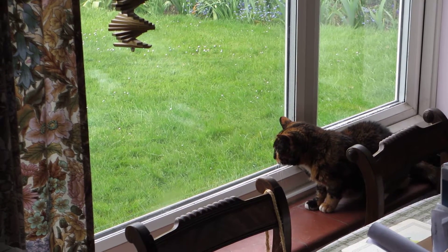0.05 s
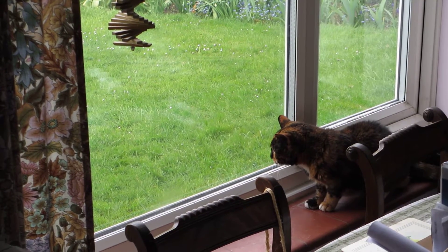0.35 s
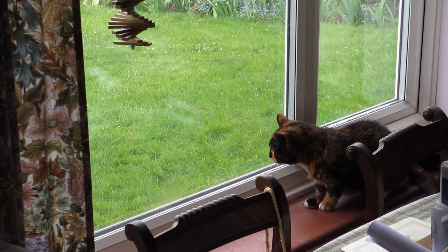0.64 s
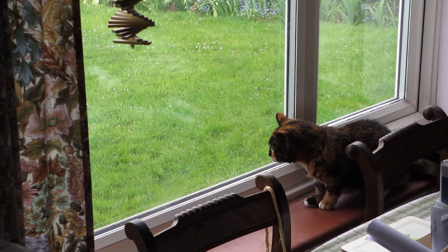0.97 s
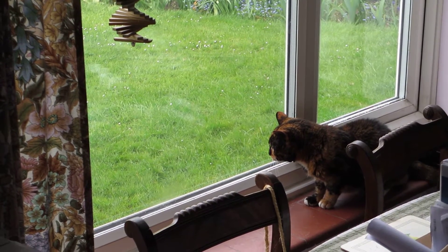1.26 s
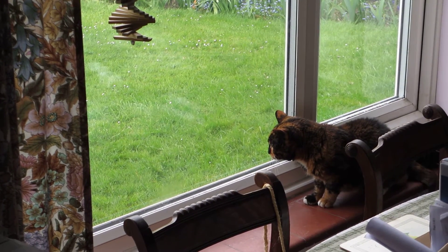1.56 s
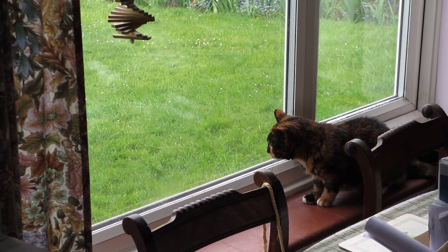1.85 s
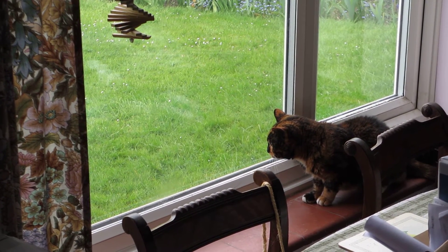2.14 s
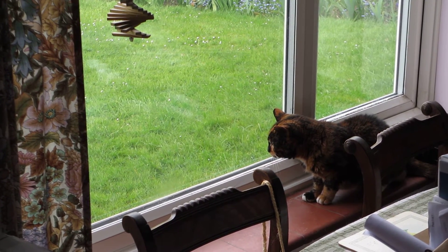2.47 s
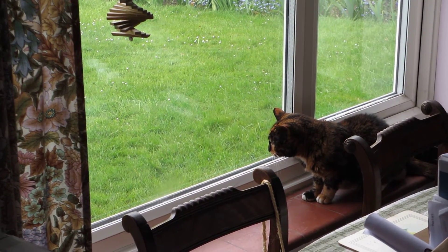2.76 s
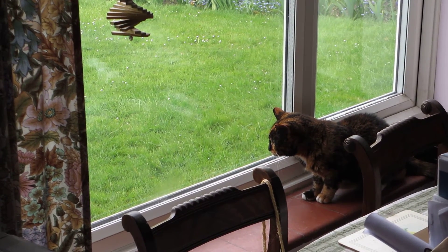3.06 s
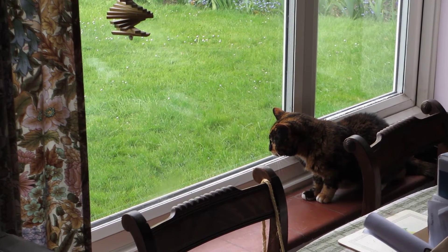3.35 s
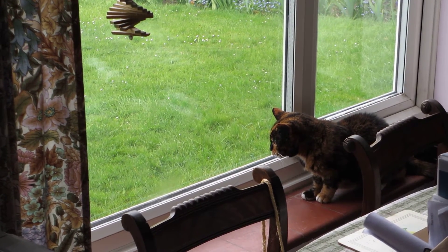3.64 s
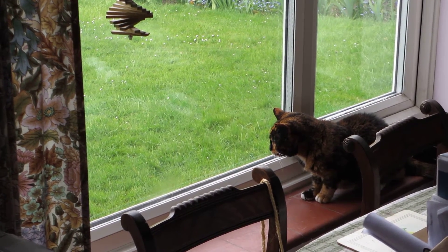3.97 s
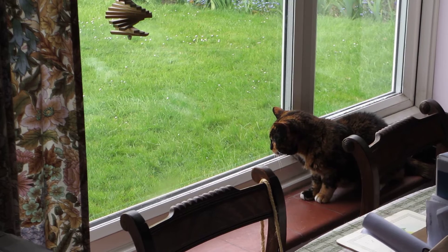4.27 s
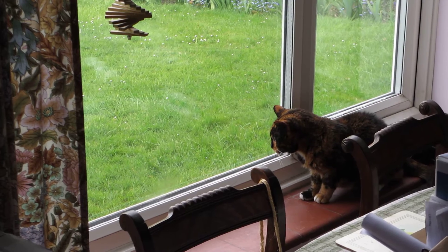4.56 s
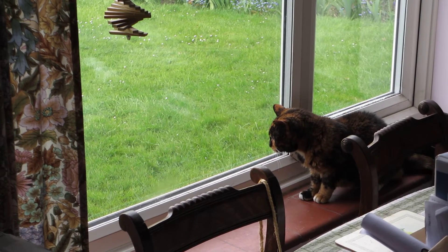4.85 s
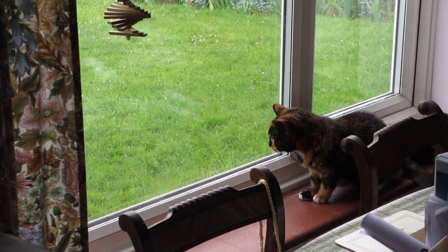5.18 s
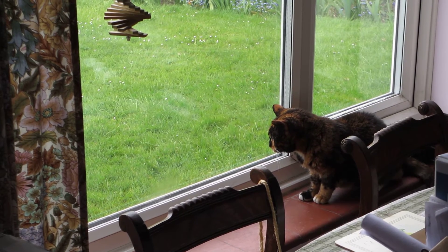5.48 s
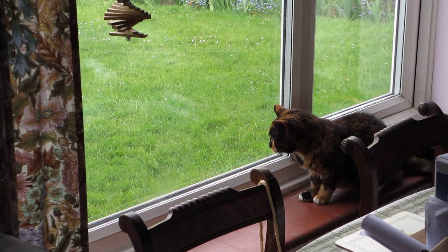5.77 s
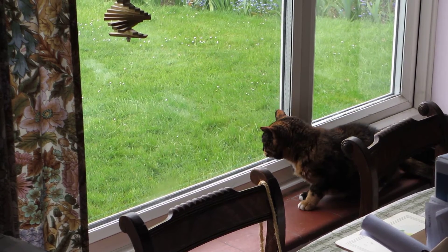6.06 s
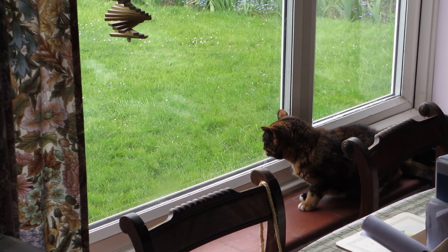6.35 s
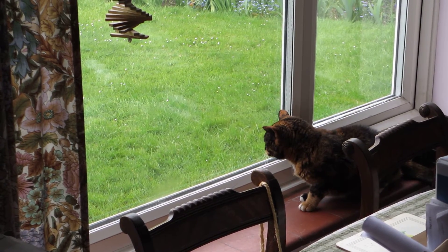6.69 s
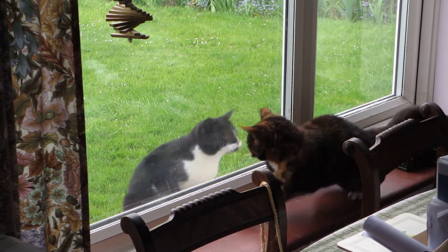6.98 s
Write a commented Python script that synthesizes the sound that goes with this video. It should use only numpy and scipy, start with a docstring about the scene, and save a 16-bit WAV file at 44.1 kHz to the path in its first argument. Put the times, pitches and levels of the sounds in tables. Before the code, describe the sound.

In a quiet room with faintly humming appliances, a cat growls once, a little off to the side of the microphone. The growl swells and wavers, then slides lower and turns dull and ragged before stopping. After a few seconds of room noise, three short hoots sound barely audibly from far away. At the end the cat shifts on its seat with a dull bump and light rubbing of paws.

```python
"""Cat growling on a window seat

Indoors, a little off the microphone's axis, a cat growls at another cat outside. Its vocal folds give one
long call that starts rough, clears, sinks in pitch and breaks up again; the harmonics swell and fade as
they glide across the room's standing waves. Appliances hum over quiet room noise. Later come three faint
hoots from far off, and at the end the cat shifts on the seat."""
import sys
import numpy as np
from scipy import signal
from scipy.fft import rfft, irfft, next_fast_len
from scipy.io import wavfile
from scipy.ndimage import uniform_filter1d, map_coordinates

SR = 44100
rng = np.random.default_rng(int(sys.argv[2]) if len(sys.argv) > 2 else 0)


def log_audio(samples):
    """Write samples as a 16-bit WAV file to the path given in sys.argv[1]."""
    # one column per channel
    frames = np.atleast_2d(samples).T
    # limit to full scale, then quantise
    limited = np.clip(frames, -1, 1)
    pcm = np.round(limited * 32767).astype(np.int16)
    wavfile.write(sys.argv[1], SR, pcm)


N = 309582
TIME = np.arange(N) / SR


def amp(db):
    """Decibels to gain."""
    return 10 ** (np.asarray(db) / 20)


def along(points, hz):
    """(Hz, value) points read on a log frequency axis."""
    freqs, values = np.transpose(points)
    return np.interp(np.log(hz + 1), np.log(freqs), values)


def curve(points):
    """(seconds, value) points read at every sample."""
    return np.interp(TIME, *np.transpose(points))


def ramp(start, length):
    """0 before start, rising evenly to 1 over length seconds."""
    return np.clip((TIME - start) / length, 0, 1)


def burst(start, t60):
    """An envelope that jumps up at start and dies away."""
    age = np.maximum(TIME - start, 0)
    return (1 - np.exp(-age / 0.00034)) * amp(-60 * age / t60)


def wobble(rate):
    """A smooth random curve, rate knots a second."""
    return map_coordinates(rng.standard_normal(int(N * rate / SR) + 4), [TIME * rate])


def filtered(x, response):
    """x through a complex frequency response."""
    size = next_fast_len(N + SR // 2)
    return irfft(rfft(x, size) * response(np.fft.rfftfreq(size, 1 / SR)), size)[..., :N]


def resonance(f, hz, width):
    """Response of one resonance."""
    return 1j * f * width / (hz * hz - f * f + 1j * f * width)


def noise(response):
    """Stereo noise of rms 1 with the given colour."""
    x = filtered(rng.standard_normal((2, N)), response)
    return x / np.sqrt(np.mean(x ** 2))


# Room tone around the microphone. Each row: frequency in Hz, mid gain in dB, side gain in dB.
ROOM_TONE = [(20, -45, -32.5), (45.2, -35, -26.5), (80, -38.5, -23.5), (213, -38, -27), (350, -42, -32.5),
             (961, -47.5, -41), (1037, -42.5, -33), (1440, -53, -44), (1550, -53, -46),
             (2810, -65.5, -65.5), (4320, -73.5, -72), (9300, -75.5, -75), (9480, -67.5, -77),
             (9800, -74, -75), (15500, -71, -71.5)]


def room_tone():
    """Quiet, steady noise, wide and strongest in the bass."""
    bands = np.array(ROOM_TONE)
    white = rng.standard_normal((2, N))
    mid, side = filtered(white, lambda f: amp([along(bands[:, [0, column]], f) for column in (1, 2)]))
    return np.array([mid + side, mid - side])


# Appliances heard in the room. Each row: frequency in Hz, left level in dB, right level in dB,
# phase lead of the left channel in radians.
HUM_LINES = [(50, -65, -64, -2.2), (70, -62, -64, 2.2), (100.2, -50.5, -51.5, .1), (120, -55, -56, .2),
             (200.4, -63, -68, .3), (290.1, -50, -52, -.1), (350.6, -69, -68, -.9), (500.9, -71, -71, -.3),
             (1802, -75, -81, -2.3), (4631, -81, -88, -2.6), (12408, -80, -94, -1.1), (12656, -87, -99, -1)]


def appliance_hum(drift_rad=0.21, waver_db=0.94):
    """Appliances hum and whine, each line slightly unsteady in phase and level."""
    hum = np.zeros((2, N))
    for hz, left_db, right_db, lead in HUM_LINES:
        phase = 2 * np.pi * (hz * TIME + rng.random()) + drift_rad * wobble(0.59)
        pair = np.array([amp(left_db) * np.sin(phase + lead), amp(right_db) * np.sin(phase)])
        hum += np.sqrt(2) * amp(waver_db * wobble(5)) * pair
    return hum


# The glide of the call from the window seat. Each row: time in seconds, pitch in Hz.
CALL_PITCH = [(0.1, 136.4), (0.14, 187), (0.17, 206.8), (0.2, 224.3), (0.25, 233.6), (0.84, 213.8),
              (1.21, 192.8), (1.48, 174.3), (1.82, 159.9), (1.96, 149.4), (2.14, 132.6), (2.35, 107.6),
              (2.46, 89.9)]
CALL_END_S = 2.487


def growl(slack_hz=170.2, jitter=0.088, shimmer_db=6):
    """Vocal folds rasp, catch a steady tone, then go slack and turn dull and uneven as the pitch sinks."""
    pitch = curve(CALL_PITCH)
    slack = np.maximum(np.log2(slack_hz / pitch), 0)  # octaves below slack_hz
    rough = 0.015 + 0.63 * (1 - ramp(0.125, 0.05)) + 0.28 * slack
    unsteady_pitch = pitch * (1 + jitter * rough * wobble(110) + 0.0012 * wobble(35))
    cycles = np.cumsum(unsteady_pitch) / SR
    voice = throat(pitch, cycles, slack, rough)
    voice *= amp(effort_db() + 11.5 * slack + shimmer_db * rough * wobble(90))
    sounding = np.clip((CALL_END_S - TIME) / 0.048, 0, 1)
    return (voice + head_rings(pitch, cycles, slack)) * sounding


def effort_db(base_db=-41, swell_s=0.73, sag_db_per_s=4.5, release_s=0.13):
    """The call swells, slowly tires, gets a last push before the air runs out, and dies away."""
    swell = 15 * (ramp(0, swell_s) - 1)
    sag = sag_db_per_s * np.clip(TIME - swell_s, 0, CALL_END_S)
    push = 3.5 * ramp(1.775, 0.041)
    release = 10 * ramp(CALL_END_S - release_s, release_s)
    return base_db + swell - sag + push - release


# The colour of the cat's throat. Each row: frequency in Hz, gain in dB.
THROAT_COLOUR = [(90, -11), (150, 4.5), (250, 4), (400, 16.5), (520, 4.5), (700, -9.5), (900, -7),
                 (1000, -17.5), (1400, -29.5), (1800, -38), (2500, -39), (3500, -66)]


def throat(pitch, cycles, slack, rough, mouth_hz=2050, mouth_width_hz=300, rasp_db=6, build_s=0.028):
    """Harmonics and breath from the folds, shaped by the throat and by the room's standing waves."""
    jaw_open = ramp(0.081, 0.23) - ramp(0.45, 0.2)
    tilt_db_per_octave = 1 + 4 * jaw_open - 14.5 * slack
    mouth_db = 14 * (ramp(0, 0.62) - ramp(0.72, 0.1))  # a bright resonance grows, then is shut off
    tone = np.zeros(N)
    for k in range(1, 17):
        hz = k * pitch
        mouth_peak = np.exp(-((hz - mouth_hz) / mouth_width_hz) ** 2)
        gain = amp(along(THROAT_COLOUR, hz) + mouth_db * mouth_peak + tilt_db_per_octave * np.log2(k))
        # a standing wave takes build_s to build up or fade
        room = uniform_filter1d(standing_waves(hz), int(build_s * SR) + 1)
        tone += np.sqrt(2) * np.imag(gain * room * np.exp(2j * np.pi * k * cycles))
    # turbulence escapes once a cycle and takes over from the tone as the voice roughens
    breath = noise(lambda f: amp(along(THROAT_COLOUR, f)) * standing_waves(f) * (f > 80))[0]
    puffs = breath * (1 + np.cos(2 * np.pi * cycles))
    return np.clip(1 - rough ** 2, 0, 1) * tone + amp(rasp_db) * rough * puffs


# Standing waves between seat and microphone. Each row: frequency in Hz, width in Hz, gain in dB.
ROOM_MODES = [(148, 20, 4.5), (173, 20, -1.5), (231.7, 32, 9), (278.1, 12, -7.5), (300, 6.9, 6.5),
              (340, 36, 0.5), (356.4, 5, 5.5), (381.2, 4.5, -17), (391.4, 12, 4.5), (408, 28, 6),
              (458.9, 6.9, -18.5), (474, 5.4, 9.5), (483, 13, -10), (582, 5, -19.5), (607, 32, 8.5),
              (614.5, 8, -14.5), (662, 2.2, -19), (682, 29, 6), (756, 8, -9), (815.2, 20, 11),
              (924, 7.6, 9)]


def standing_waves(f):
    """The room favours some pitches, swallows others and shifts their phase."""
    grid_hz = np.arange(1500)
    response = 1
    for hz, width, db in ROOM_MODES:
        detuning = hz ** 2 - grid_hz ** 2
        damping = 1j * grid_hz * width
        depth = amp(db / 2)
        response = response * (detuning + damping * depth) / (detuning + damping / depth)
    return np.interp(f, grid_hz, response)


# Resonances of the cat's nose, and thinner, higher ones of its head.
# Each row: frequency in Hz, width in Hz, relative gain in dB.
NOSE_MODES = [(2420, 590, 4), (3320, 220, -1.5), (4940, 700, -14.5)]
HEAD_MODES = [(10700, 390, -4), (11140, 450, -1), (11600, 900, -2.5), (13640, 1200, -7)]


def head_rings(pitch, cycles, slack, steady_s=0.15, nose_db=-72, head_db=-73.5):
    """Each closure of the folds rings nose and head: more once the tone is steady, less when slack."""
    from_closure_s = (cycles - np.round(cycles)) / pitch
    closures = np.exp(-(from_closure_s / 3e-5) ** 2) * amp(wobble(200))
    sharpness_db = 13 * (ramp(steady_s, 0.16) - 1) - 15.5 * slack
    relaxed = ramp(steady_s, 1.1)
    nose = amp(nose_db + 4 * TIME) * sinking_ring(closures, NOSE_MODES, relaxed)  # ever more nasal
    head = amp(head_db) * sinking_ring(closures, HEAD_MODES, relaxed)
    return amp(sharpness_db) * (nose + head)


def sinking_ring(pulses, modes, relaxed, start_ratio=1.05):
    """Steep resonances fade from a higher tuning to their own as the throat relaxes; rms 1 in the call."""
    def tuned(ratio):
        return filtered(pulses, lambda f: sum(amp(db) * resonance(f, ratio * hz, width) ** 2
                                              for hz, width, db in modes))
    ring = np.sqrt(1 - relaxed) * tuned(start_ratio) + np.sqrt(relaxed) * tuned(1)
    return ring / np.std(ring[TIME < CALL_END_S])


# Wet ticks at the cat's mouth as the call begins.
# Each row: start in seconds, overall gain in dB, extra gain of the low ring in dB.
MOUTH_TICKS = [(0.0634, -39.5, -0.5), (0.086, -49, 15), (0.114, -54.5, -3.5), (0.19, -43, 3.5),
               (0.242, -52.5, 3.5), (0.309, -43.5, 3), (0.3575, -44, 2)]


def mouth_ticks(snap_t60=0.004, ring_t60=0.018):
    """Lips and tongue part with tiny clicks that ring briefly in the mouth."""
    snap = amp(-3) * noise(lambda f: resonance(f, 7500, 16000))[0]
    ring = amp(-7) * noise(lambda f: resonance(f, 1150, 1600) ** 2)[0]
    return sum(amp(db) * (burst(start, snap_t60) * snap + amp(ring_db) * burst(start, ring_t60) * ring)
               for start, db, ring_db in MOUTH_TICKS)


def off_axis(x, lag_s=0.0002, bass_db=0.9):
    """The cat sits off axis: the left side of the microphone hears it later, and its bass louder."""
    side = np.array([[1], [-1]])
    return filtered(x, lambda f: np.exp(-1j * np.pi * f * lag_s * side)
                    * amp(side * bass_db / (1 + (f / 500) ** 4)))


# The room's decay at the microphone. Each row: frequency in Hz, time to fall 60 dB in seconds.
WALL_DECAY = [(200, 0.64), (2000, 0.27), (12000, 0.017)]


def wall_reverb(x, low_cut_hz=800):
    """The diffuse answer of the walls, above the range of the standing waves."""
    hz, age, spectrum = signal.stft(rng.standard_normal((2, SR // 2)), SR, nperseg=256)
    decay = amp(-60 * age / along(WALL_DECAY, hz)[:, None])
    tail = signal.istft(spectrum * decay, SR, nperseg=256)[1]
    wet = signal.fftconvolve(x[None], tail / np.linalg.norm(tail[0]), axes=1)[:, :N]
    return filtered(wet, lambda f: f ** 2 / (f ** 2 + low_cut_hz ** 2))


# Hoots far from the microphone.
# Each row: centre in seconds, half length in seconds, pitch in Hz, level in dB.
FAR_HOOTS = [(5.63, .05, 540, -56), (5.78, .04, 550, -53), (6.07, .04, 535, -57)]


def far_hoots(width_hz=60):
    """Short, soft tones: narrow bands of noise that swell and fade."""
    hoots = np.zeros((2, N))
    for centre, half_length, hz, db in FAR_HOOTS:
        swell = np.exp(-((TIME - centre) / half_length) ** 2)
        hoots += amp(db) * swell * noise(lambda f: resonance(f, hz, width_hz) ** 2)
    return hoots


# The window seat under the cat. Each row: time in seconds, level in dB.
SEAT_LEVEL = [(6.7, -67.5), (6.8, -54.5), (6.9, -44.5), (7.02, -47.5)]
# Its dull colour. Each row: frequency in Hz, relative gain in dB.
SEAT_COLOUR = [(20, -9), (45, 1), (130, -1), (250, -2), (500, -18.5), (1200, -26), (4000, -62)]


def seat_bump():
    """A faint low rumble swells to a bump as the cat shifts its weight."""
    return amp(curve(SEAT_LEVEL)) * noise(lambda f: amp(along(SEAT_COLOUR, f)))


# Paws on the window seat.
# Each row: start in seconds, level in dB, time to fall 60 dB in seconds, treble gain in dB.
PAW_SCUFFS = [(6.894, -46, 0.032, -23), (6.947, -51.5, .05, 7.5), (6.965, -58, .4, 4.5)]
# The colour of their rubbing. Each row: frequency in Hz, relative gain in dB.
RUB_COLOUR = [(300, -8.5), (1200, -1.5), (3000, 4.5), (5000, -12), (8000, -6.5), (11000, 4), (15500, -4)]


def paw_scuffs(treble_hz=4500):
    """Paws rub over the seat in short bursts, some dull and some bright."""
    rub = noise(lambda f: amp(along(RUB_COLOUR, f)))
    treble = filtered(rub, lambda f: f ** 4 / (f ** 4 + treble_hz ** 4))
    return sum(amp(db) * burst(start, t60) * (rub + (amp(treble_db) - 1) * treble)
               for start, db, t60, treble_db in PAW_SCUFFS)


def scene(growl_db=-0.08, reverb_db=-6):
    """The cat and its room, heard from one stereo microphone indoors."""
    cat = amp(growl_db) * growl() + mouth_ticks()
    cat_in_room = off_axis(cat) + amp(reverb_db) * wall_reverb(cat)
    movement = paw_scuffs() + seat_bump()
    return cat_in_room + movement + far_hoots() + room_tone() + appliance_hum()


def record(dry, top_hz=15760):
    """The camera keeps nothing above its band limit."""
    return filtered(dry, lambda f: f < top_hz)


dry = scene()
out = record(dry)
log_audio(out)
```